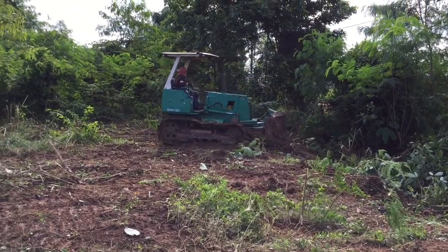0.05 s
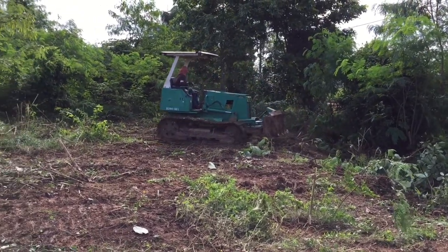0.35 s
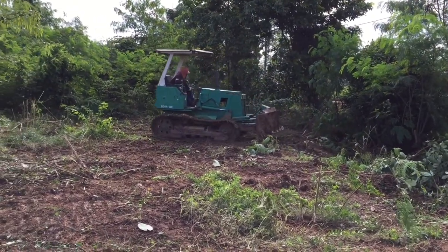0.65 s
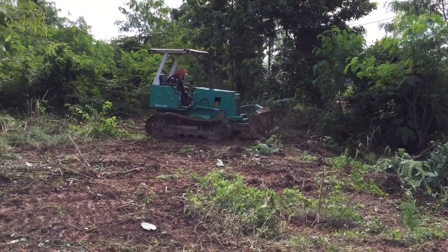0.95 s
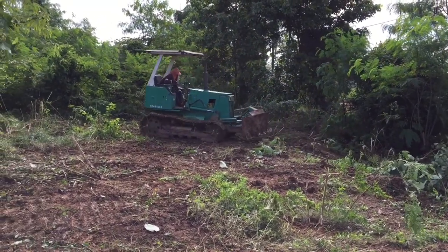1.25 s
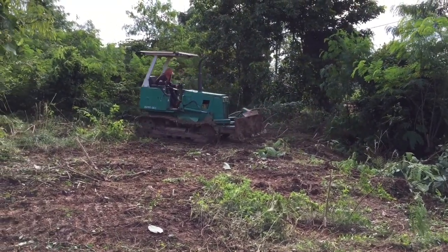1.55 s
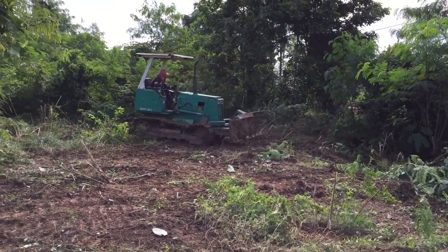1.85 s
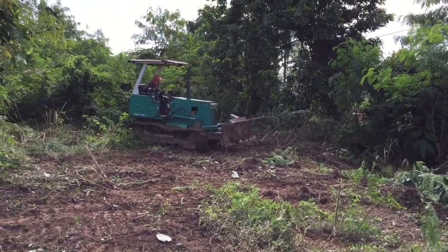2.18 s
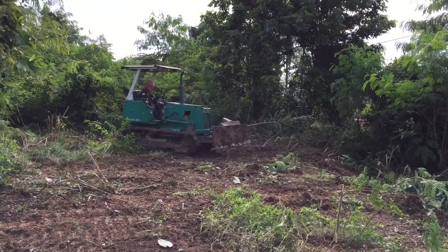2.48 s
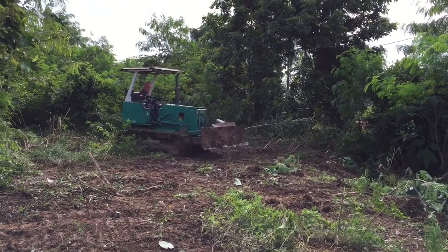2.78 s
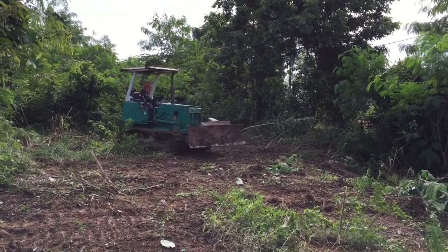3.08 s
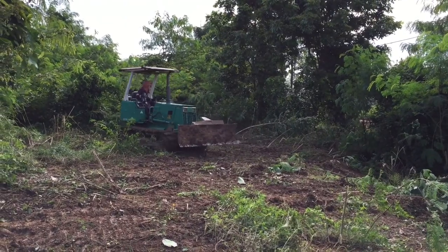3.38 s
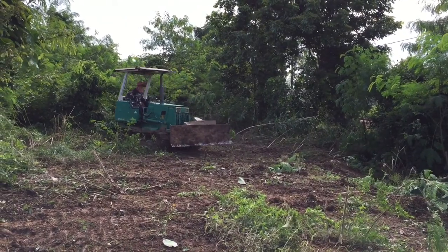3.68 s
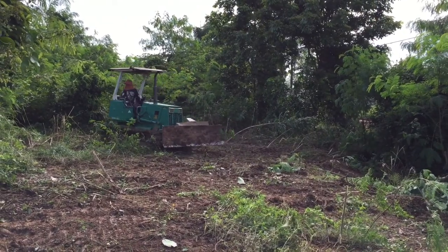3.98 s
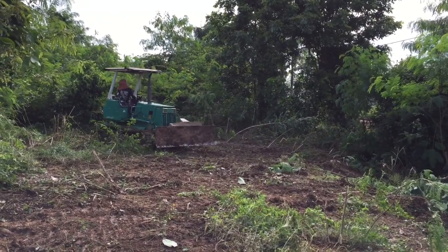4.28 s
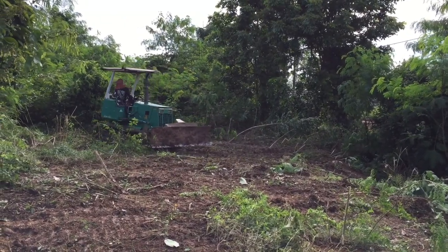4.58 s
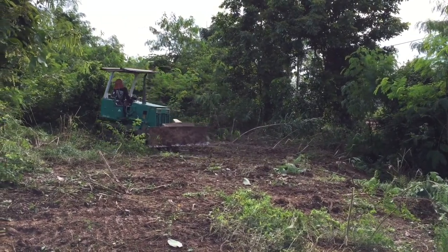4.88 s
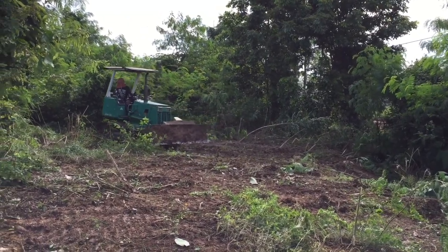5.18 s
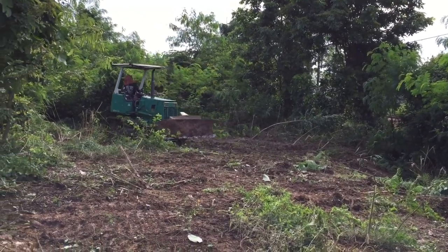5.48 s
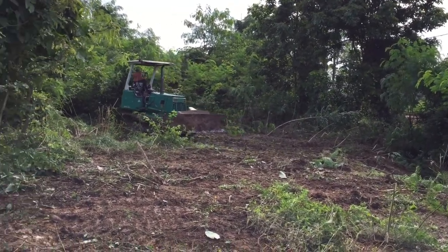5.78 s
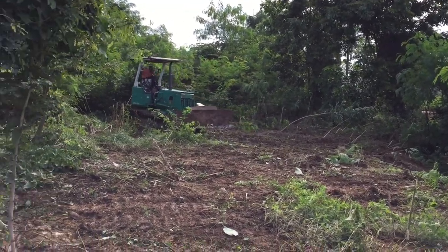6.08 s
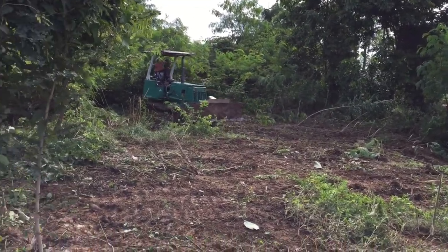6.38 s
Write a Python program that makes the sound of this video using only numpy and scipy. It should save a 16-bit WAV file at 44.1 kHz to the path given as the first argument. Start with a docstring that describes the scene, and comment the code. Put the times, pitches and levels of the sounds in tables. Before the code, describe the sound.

Steady diesel engine rumble from a small bulldozer outdoors, with irregular track clanks, a skidding turn and faint rustling foliage.

```python
"""A small four-cylinder diesel bulldozer works through brush some way off. From the start, uneven
exhaust pulses boom in the pipe, the block clatters with each firing, gears whine and steel tracks clank.
At 2 s something chirps, very high, in the trees. Then the machine turns from side-on to face the
listener: the engine bogs down and slowly recovers, and the tracks skid and scrape. Foliage drags along
the blade, and near 6 s a second chirp comes and two twigs snap. All along, the listener falls back."""
import sys
import numpy as np
from scipy import signal
from scipy.fft import rfft, irfft, next_fast_len
from scipy.io import wavfile
from scipy.ndimage import map_coordinates

SR = 44100
rng = np.random.default_rng(int(sys.argv[2]) if len(sys.argv) > 2 else 0)


def wav_record(signal):
    """Record a signal, one row per channel, as 16-bit PCM in the file named by sys.argv[1]."""
    frames = np.transpose(np.atleast_2d(signal))
    bounded = np.clip(frames, -1, 1)
    # unit amplitude maps onto the largest positive 16-bit level
    quanta = np.round(bounded * 32767).astype(np.int16)
    wavfile.write(sys.argv[1], SR, quanta)


N = 288414


def amp(db):
    """Turn decibels into a gain."""
    return 10 ** (np.asarray(db) / 20)


def unit(x):
    """Scale a signal to an average (rms) level of 1."""
    return x / np.sqrt(np.mean(x ** 2) + 1e-20)


def clock():
    """The time of each sample, in seconds."""
    return np.arange(N) / SR


def wobble(rate_hz):
    """A smooth random curve through rate_hz points a second."""
    return map_coordinates(rng.standard_normal(int(N * rate_hz / SR) + 4), [clock() * rate_hz])


def swells(rows):
    """Add up bell-shaped bumps, one for each (middle_s, half_width_s, height) row."""
    return sum(height * np.exp(-((clock() - s) / width) ** 2) for s, width, height in rows)


def filtered(x, response):
    """Multiply each frequency f in x by response(f)."""
    size = next_fast_len(N + SR // 2)
    return irfft(rfft(x, size) * response(np.fft.rfftfreq(size, 1 / SR)), size)[:N]


def dulled(x, cutoff_hz):
    """Soften the treble above cutoff_hz."""
    return filtered(x, lambda f: 1 / np.sqrt(1 + (f / cutoff_hz) ** 4))


def coloured(x, points):
    """Shape the tone of x with (pitch_hz, level_db) points; comes out at level 1."""
    hz, db = np.transpose(points)
    return unit(filtered(x, lambda f: amp(np.interp(np.log(f + 1), np.log(hz), db))))


def resonate(x, modes, low_hz):
    """Play x through a ringing body that gives off little below low_hz; comes out at level 1."""
    def body(f):
        return sum((-1) ** k * amp(db) * 1j * f * width / (hz * hz - f * f + 1j * f * width)
                   for k, (hz, width, db) in enumerate(modes))
    return unit(filtered(x, lambda f: body(f) * (1j * f / (low_hz + 1j * f)) ** 3))


def pulses(times, sizes):
    """A click at each time, shared between its two nearest samples."""
    at = np.clip(times * SR, 0, N)
    i = at.astype(int)
    before = np.bincount(i, sizes * (1 - at + i), N + 2)
    after = np.bincount(i + 1, sizes * (at - i), N + 2)
    return (before + after)[:N]


TAIL = SR // 4  # samples in one dying sound
TAIL_TIME = np.arange(TAIL) / SR

def fade(ring_s):
    """A quarter second of dying away, at a pace of 60 dB every ring_s."""
    return amp(-60 * TAIL_TIME / ring_s)


def burst(ring_s, rise_s=0.000083):
    """A burst of noise that swells and dies, with energy 1."""
    noise = fade(ring_s) * (1 - np.exp(-TAIL_TIME / rise_s)) * rng.standard_normal(TAIL)
    return noise / np.linalg.norm(noise)


def ring(clicks, tail):
    """Every click starts a copy of the tail."""
    return signal.fftconvolve(clicks, tail)[:N]


def flares(times, sizes, ring_s, steady):
    """Noise that flares up at each time, on top of a steady share."""
    loudness = unit(ring(pulses(times, sizes), fade(ring_s))) + steady
    return unit(loudness * rng.standard_normal(N))


def clank(modes, crack, pitch=1, rise_s=.0008, scatter_db=1.4, detune=0.009):
    """One blow on steel: ringing tones, a little different each time, and a crack of noise; peak 1."""
    tone = 0
    for hz, db, ring_s in modes:
        loudness = amp(db + rng.normal(0, scatter_db)) * fade(ring_s)
        tone += loudness * np.sin(2 * np.pi * pitch * hz * rng.normal(1, detune) * TAIL_TIME)
    noise = crack * fade(0.017) * rng.standard_normal(TAIL)
    blow = (tone + noise) * (1 - np.exp(-TAIL_TIME / rise_s))
    return blow / np.abs(blow).max()


def rattles(rows, modes, crack, detune):
    """A loose steel part rings at each (start_s, level_db) row, dulled by mud."""
    out = np.zeros(N + SR)
    for s, db in rows:
        out[int(s * SR):][:TAIL] += amp(db) * clank(modes, crack, detune=detune)
    return dulled(out[:N], cutoff_hz=6000)


def facing(middle_s=2.66, length_s=0.7):
    """How far the machine has turned: 0 is side-on, 1 is facing the listener."""
    return .5 + .5 * np.sin(np.pi * np.clip((clock() - middle_s) / length_s, -.5, .5))


# how far away the listener is: time_s, distance_m
LISTENER_PATH = [(0, 13.5), (2.2, 15.96), (4.8, 16.7), (6.54, 19.1)]

def heard_db(side_db, front_db):
    """The level of one engine sound: it shifts with the turn and drops as the distance grows."""
    metres = np.interp(clock(), *np.transpose(LISTENER_PATH))
    return side_db + (front_db - side_db) * facing() - 20 * np.log10(metres / metres[0])


# drag slowing the engine: start_s, speed_drop_hz, recovery_s
ENGINE_DRAGS = [(-.33, .6, .2), (2.347, 1.77, .784)]
GOVERNED_HZ = 58.014  # firings a second with no drag

def speed(sag_s=.327):
    """Firings a second: each drag pulls the speed down fast, and the governor slowly brings it back."""
    lost_hz = 0
    for start_s, drop_hz, recovery_s in ENGINE_DRAGS:
        age = clock() - start_s
        lost_hz += drop_hz * np.clip(age / sag_s, 0, 1) * np.exp(-np.maximum(age - sag_s, 0) / recovery_s)
    return GOVERNED_HZ - lost_hz


# chirps in the trees: middle_s, half_width_s, pitch_hz, level_db
TREE_CHIRPS = [(2.01, .035, 14900, -45), (5.855, .035, 14850, -47)]

def chirps(waver_hz=70):
    """Two thin, wavering chirps at the top of hearing."""
    tone = lambda hz: np.sin(2 * np.pi * np.cumsum(hz + waver_hz * wobble(200)) / SR)
    return sum(swells([(s, width, amp(db))]) * tone(hz) for s, width, hz, db in TREE_CHIRPS)


# leaves being brushed: middle_s, half_width_s, level_db
LEAF_SWISHES = [(0.039, 0.017, -29.5), (4.152, 0.053, -36.5), (4.845, 0.032, -38)]

def leaves():
    """Brushed leaves swish in short, crackly swells."""
    loudness = swells((s, width, amp(db)) for s, width, db in LEAF_SWISHES)
    crackle = rng.standard_normal(N) * amp(0.88 * wobble(400))
    tone = [(500, 13.5), (2000, 12.0), (3800, 8.0), (7000, -0.5), (12000, -6), (15500, -13)]
    return loudness * coloured(crackle, tone)


def rustle(start_s=3.4, end_s=5.7, ticks_per_s=40, loudest_db=-34, range_db=8):
    """Small twigs tick at random as foliage drags along the blade."""
    length_s = end_s - start_s
    when, strength = rng.random((400, 2))[:int(ticks_per_s * length_s)].T
    ticks = pulses(start_s + length_s * when, amp(loudest_db - range_db * (1 - strength)))
    grains = ring(ticks, fade(0.015)) * rng.standard_normal(N)
    tone = [(500, -5), (2000, 3), (3800, -2), (4700, -10), (5500, -1), (7500, -12), (12000, -15),
            (15500, -17)]
    return grains.std() * coloured(grains, tone)


# twigs breaking: start_s, strength_db
TWIG_SNAPS = [(5.8805, -12), (5.9439, -4.5)]

def twigs():
    """Dry twigs snap, each with a short, bright burst of noise."""
    start_s, db = np.transpose(TWIG_SNAPS)
    snaps = ring(pulses(start_s, amp(db)), burst(ring_s=.014))
    return filtered(snaps, lambda f: np.exp(-((f - 9000) / 4700) ** 4))


# a spell of squeaking: middle_s, half_width_s, level_db
SQUEAK_SPELLS = [(2.62, 0.49, -61.5)]

def squeak(times, cylinder, pitch_hz=9600, ring_s=0.019, lead_s=.003):
    """While the engine labours, a dry part squeaks just before the second cylinder's exhaust pulse."""
    starts = times[cylinder == 1] - lead_s
    tone = fade(ring_s) * np.sin(2 * np.pi * pitch_hz * TAIL_TIME)
    loudness = swells((s, width, amp(db)) for s, width, db in SQUEAK_SPELLS)
    return loudness * unit(ring(pulses(starts, 1), tone))


# the tracks skidding sideways: middle_s, half_width_s, level_db
TRACK_SKIDS = [(3.04, .34, -39), (4.24, .15, -45.5)]
# tones of the rubbing track: pitch_hz, width_hz, level_db
SCRAPE_TONES = [(838, 35, 8), (1100, 140, 1.5), (1560, 160, -1), (1886, 160, 1), (2150, 200, -5),
                (2850, 200, -9), (6570, 200, -15)]

def scrape(rolling_db=-55.5, slip_db=2):
    """Links rub on the rollers in quick slips, loudest when the tracks skid."""
    slips = rng.standard_normal(N) * amp(slip_db * wobble(70))
    loudness = amp(rolling_db) + swells((s, width, amp(db)) for s, width, db in TRACK_SKIDS)
    return loudness * resonate(slips, SCRAPE_TONES, low_hz=406)


# track pins clicking: start_s, level_db
PIN_CLICKS = [(.7256, -18.5), (2.173, -33), (2.311, -33), (2.654, -31), (2.757, -35), (3.043, -30),
              (3.053, -34), (3.065, -34), (3.38, -35), (3.45, -35), (3.661, -36), (3.731, -36),
              (4.007, -34), (4.052, -34), (4.106, -29), (4.125, -29)]
# tones of a pin: pitch_hz, level_db, ring_s
PIN_TONES = [(2850, -8, .02), (3300, -3, .012), (3560, 0, .012), (3800, -4, .014), (4300, -11, .01)]

def pins():
    """Steel track pins click and ring, mostly during and after the turn."""
    return rattles(PIN_CLICKS, PIN_TONES, crack=.25, detune=.025)


# a loose panel rapping: start_s, level_db
RAPS = [(.022, -33.5), (.325, -27.5), (.358, -35), (.7275, -29), (.738, -26), (1.241, -40), (1.298, -24.5),
        (1.503, -30), (1.644, -28), (2.047, -35), (2.276, -38), (2.82, -37), (2.956, -30), (4.282, -33),
        (4.7, -28), (5.387, -28)]
# tones of that panel: pitch_hz, level_db, ring_s
PANEL_TONES = [(1604, -2.5, 0.036), (1770, -6, 0.061), (1970, -18, 0.035)]

def loose_panel():
    """A loose steel panel raps now and then, ringing briefly."""
    return rattles(RAPS, PANEL_TONES, crack=.18, detune=.018)


# track links striking: start_s, pitch_ratio, link_level_db, frame_level_db
LINK_STRIKES = [(.035, .87, -31, -42), (.066, .9, -36, -34), (.176, .95, -26, -44), (.726, .99, -18.5, -37),
                (.7318, .985, -15, -46), (1.045, 1.0, -26, -47), (1.909, .98, -28, -44),
                (2.376, .95, -29, -44), (2.795, .96, -24.5, -40), (3.118, .92, -32, -32),
                (3.272, 1.02, -22.5, -36), (3.310, .95, -23, -35), (3.355, 1.02, -28, -32),
                (4.145, 1.0, -28, -42), (4.228, .86, -28, -32), (4.364, 1.0, -24, -42),
                (4.377, .82, -29, -25), (4.624, .98, -29, -33), (4.658, .84, -29, -37),
                (4.688, .86, -35, -32), (4.803, .86, -30, -37), (5.254, .9, -29, -37),
                (5.381, .86, -26.5, -38), (5.405, .89, -26.5, -41), (5.681, .98, -30, -39),
                (6.328, .9, -35, -37)]
# tones of a link and of the track frame: pitch_hz, level_db, ring_s
LINK_TONES = [(875, -6, .05), (990, -7, .03), (1050, 0, .036), (1150, -16, .025), (1400, -18, .03),
              (2750, -17, .016), (3500, -15, .012), (3950, -18, .012)]
FRAME_TONES = [(447, -9.5, 0.11), (579, -6, 0.071), (767, 0.5, 0.017)]

def tracks(small_count=50):
    """Loud clanks among many small ones: each rings a link and knocks the frame, dulled by soil."""
    small = rng.normal([0, .93, -36, -41], [0, 0.5, 2.0, 2.0], (small_count, 4))  # same four columns
    small[:, 0] = rng.uniform(0, N / SR, small_count)
    out = np.zeros(N + SR)
    for s, pitch, link_db, frame_db in list(LINK_STRIKES) + list(small):
        link = amp(link_db) * clank(LINK_TONES, crack=0.28, pitch=pitch)
        frame = amp(frame_db) * clank(FRAME_TONES, crack=0.03)
        out[int(s * SR):][:TAIL] += link + frame
    return dulled(out[:N], cutoff_hz=5000)


def whine(crank, multiple, waver_db=3):
    """A tone at a multiple of the firing rate, made unsteady by slack between gear teeth."""
    slack = (0.45 + .009 * multiple) * wobble(18)
    return unit(np.sin(2 * np.pi * multiple * crank + slack) * amp(waver_db * wobble(7)))


def pump(crank, loaded_db=-45.5, idle_db=-63, stop_s=0.26, release_s=0.07):
    """The hydraulic pump whines until the blade stops moving, then idles faintly."""
    tones = amp(-1) * whine(crank, 6) + whine(crank, 12)
    roughness = 1 + 0.25 * wobble(70)
    pressure = np.exp(-np.maximum(clock() - stop_s, 0) / release_s)
    return amp(idle_db + (loaded_db - idle_db) * pressure) * tones * roughness


# pitch of each gear tone: multiple_of_firing_rate
GEAR_MULTIPLES = [6, 7, 16, 18, 24, 26, 27, 30, 31, 41.5, 46.5, 52, 60]
# level of each, compared with the clatter: side_db, front_db
GEAR_LEVELS = [(-13.5, -12.5), (-21, -17), (-17, -20), (-15.5, -15), (-32, -20), (-28, -19), (-15.5, -20),
               (-22, -19), (-17, -19.5), (-32, -22.5), (-21.5, -29), (-28, -24), (-36, -26)]

def gears(crank, clatter_db):
    """Gears sing in step with the engine; the turn brings other gears forward."""
    turned = facing()
    return amp(clatter_db) * sum(amp(side_db + (front_db - side_db) * turned) * whine(crank, multiple)
                                 for multiple, (side_db, front_db) in zip(GEAR_MULTIPLES, GEAR_LEVELS))


# tone colour of the valve ticks and fan: pitch_hz, level_db
HISS_COLOUR = [(2500, -13.5), (3800, 5), (4200, -1.5), (4480, 2), (4880, -4), (5400, 0), (6450, -1),
               (7200, -6), (8600, -7.5), (9850, -2.5), (10350, -10), (11000, -6.5), (15700, -10)]

def hiss(times, cylinder, lead_s=.0013, scatter_db=1.5):
    """Injectors and valves tick just before each firing, over the fan's rush, and echo under the hood."""
    sizes = amp(scatter_db * rng.standard_normal(len(times)))
    early = times - lead_s
    ticks = sum(ring(pulses(early, sizes * (cylinder == c)), burst(0.27)) for c in range(CYLINDER_COUNT))
    rush = flares(early, sizes, ring_s=0.1, steady=1.34) * amp(2.0 * wobble(300))
    direct = rush + amp(-6) * unit(ticks)
    echo = amp(-9) * ring(direct, burst(0.063))
    return amp(heard_db(side_db=-46, front_db=-46)) * coloured(direct + echo, HISS_COLOUR)


# how hard each cylinder knocks, in firing order: level_db
CYLINDER_KNOCKS = [.5, -1.5, 1.5, 1]

def combustion(crank, cylinder, lead_firings=.17, scatter_db=1.14):
    """When and how hard the fuel fires: evenly, just ahead of the exhaust, with varying force."""
    times = np.interp(np.arange(len(cylinder)) - lead_firings, crank, clock())
    force = amp(np.array(CYLINDER_KNOCKS)[cylinder] + scatter_db * rng.standard_normal(len(cylinder)))
    return times, force


# tone colour of the crack in the cylinder head: pitch_hz, level_db
CRACK_COLOUR = [(600, -19), (1000, 8), (1350, -5), (1750, 6), (2450, -5), (2850, 1), (3200, -3),
                (3750, -6.5), (4250, -20.5), (4900, -33), (8000, -17.5)]

def cracks(times, force, clatter_db, delay_s=0.000505):
    """Each ignition opens with a short, hard crack, quieter than the clatter."""
    noise = flares(times + delay_s, force, ring_s=.028, steady=0)
    return amp(clatter_db - 6.5) * coloured(noise, CRACK_COLOUR)


# tones of the block and panels, from the side and from the front: pitch_hz, width_hz, level_db
SIDE_TONES = [(780, 150, -8.5), (1000, 124, -3), (1320, 170, -9), (1606, 132, -3), (1830, 113, -3),
              (2190, 197, -8), (2800, 160, -8), (3010, 150, -11.5), (3610, 260, -13.5)]
FRONT_TONES = [(860, 228, -8), (1040, 144, -2.5), (1297, 185, -4.5), (1560, 213, -4.5), (1776, 224, -4.5),
               (2322, 150, -6.5), (2930, 220, -8), (3650, 480, -15.5)]

def clatter(times, cylinder, force, level_db, jitter_s=.00004, slap_scatter_db=2.4):
    """Each cylinder knocks in its own way, pistons slap and loose parts rattle, all through the panels."""
    timing, strength = rng.standard_normal((len(times), 2)).T
    struck = times + jitter_s * timing
    knocks = sum(ring(pulses(struck, force * (cylinder == c)), burst(ring_s=0.15, rise_s=0.0013))
                 for c in range(CYLINDER_COUNT))
    slaps = flares(times, amp(slap_scatter_db * strength), ring_s=0.087, steady=0)
    loose = unit(flares(times, force, ring_s=0.44, steady=8.4) * amp(1.5 * wobble(250)))
    tone = [(300, 21), (700, 1.5), (3900, -3.5), (4200, -10), (4900, -8), (8000, -14)]
    shaking = coloured(unit(knocks) + amp(-9) * slaps + amp(-2) * loose, tone)
    # turning shows the listener other panels
    side = resonate(shaking, SIDE_TONES, low_hz=154)
    front = resonate(shaking, FRONT_TONES, low_hz=149)
    return amp(level_db) * unit((1 - facing()) * side + facing() * front)


# each cylinder's exhaust pulse, in firing order: delay_firings, level_db
EXHAUST_PULSES = [(.095, 2.2), (.05, -.4), (.095, 1.6), (-.042, -3.8)]
CYLINDER_COUNT = 4

def exhaust_pulses(crank):
    """The cylinders empty in turn, a little early or late: each pulse's time, cylinder and level."""
    count = np.arange(int(crank[-1]) + 1)
    cylinder = count % CYLINDER_COUNT
    delay, pulse_db = np.array(EXHAUST_PULSES)[cylinder].T
    return np.interp(count + delay, crank, clock()), cylinder, pulse_db


# tones of the exhaust pipe: pitch_hz, width_hz, level_db
PIPE_TONES = [(61, 50, -6.6), (112, 12, 0), (190, 14, -9.8), (148, 48, -10.5), (232, 14, -21),
              (130, 12, -15)]
# tone colour of the swirling gas: pitch_hz, level_db
PUFF_COLOUR = [(25, -21), (50, -4.5), (80, -9), (175, -2.5), (260, -6.5), (330, -9.5), (400, -11),
               (510, -23), (700, -18.5), (1200, -43), (3000, -76)]
# brief dips in the exhaust note (below 0 is a lift): middle_s, half_width_s, drone_dip_db, throb_dip_db
EXHAUST_DIPS = [(.62, 0.61, 3, -4.5), (3.816, 0.21, 4.5, 1.5), (5.883, 0.45, 4.5, 1.5),
                (6.402, 0.3, -0.5, 2.5)]
# the burble getting louder: middle_s, half_width_s, rise_db
BURBLE_SURGES = [(.645, 0.014, 5), (6.3, 0.2, 0)]

def exhaust(times, cylinder, pulse_db, scatter_db=0.94, jitter_s=0.0002, bog_db_per_hz=2.5):
    """Unequal pulses ring the pipe, and swirling gas puffs out with each one."""
    throb_dips = swells((s, width, db) for s, width, _, db in EXHAUST_DIPS)
    drone_dips = swells((s, width, db) for s, width, db, _ in EXHAUST_DIPS)
    bog_db = bog_db_per_hz * (GOVERNED_HZ - speed())  # the drone weakens as the engine slows
    throb_db = heard_db(side_db=-31.5, front_db=-25.5) - throb_dips + wobble(21.9)
    drone_db = heard_db(side_db=-19.5, front_db=-21.5) - drone_dips - bog_db
    burble_db = heard_db(side_db=-27, front_db=-26) + swells(BURBLE_SURGES)
    puff_db = heard_db(side_db=-33.5, front_db=-33.5)
    strength, timing = rng.standard_normal((len(times), 2)).T
    sizes = amp(pulse_db + scatter_db * strength)
    boom = -resonate(pulses(times + jitter_s * timing, sizes), PIPE_TONES, low_hz=59.0)
    puff = coloured(flares(times, sizes, ring_s=0.06, steady=1.0), PUFF_COLOUR)
    # the throb is the firing note, the drone is its octave, and the burble is all the rest
    throb, drone = (filtered(boom, lambda f: np.exp(-((f - hz) / 8) ** 4)) for hz in (58, 116))
    burble = boom - throb - drone
    pipe = amp(throb_db) * unit(throb) + amp(drone_db) * unit(drone) + amp(burble_db) * unit(burble)
    return pipe + amp(puff_db) * puff


def scene():
    """The machine and the brush, in the open air."""
    crank = np.cumsum(speed()) / SR + .169  # how far the engine has spun, counted in firings
    times, cylinder, pulse_db = exhaust_pulses(crank)
    clatter_db = heard_db(side_db=-35.8, front_db=-36.5)
    engine = exhaust(times, cylinder, pulse_db)
    engine += gears(crank, clatter_db) + pump(crank) + squeak(times, cylinder)
    fired, force = combustion(crank, cylinder)
    engine += clatter(fired, cylinder, force, clatter_db) + cracks(fired, force, clatter_db)
    engine += hiss(fired, cylinder)
    steel = tracks() + scrape() + pins() + loose_panel()
    return (engine + steel + leaves() + twigs() + rustle() + chirps())[None]


def record(dry, top_hz=15740):
    """Nothing above top_hz is heard."""
    return filtered(dry[0], lambda f: f < top_hz)[None]


dry = scene()
out = record(dry)
wav_record(out)
```